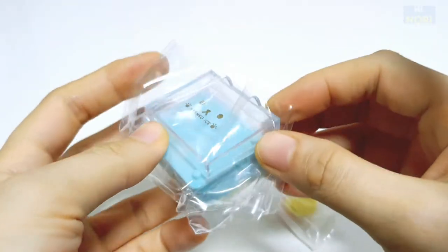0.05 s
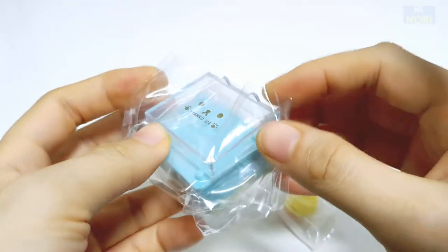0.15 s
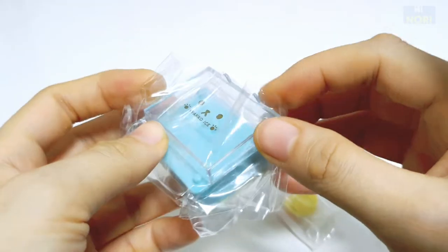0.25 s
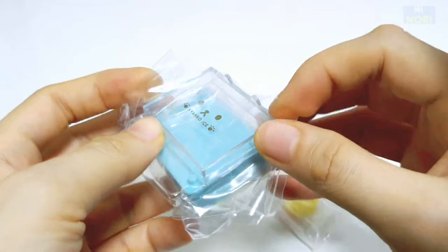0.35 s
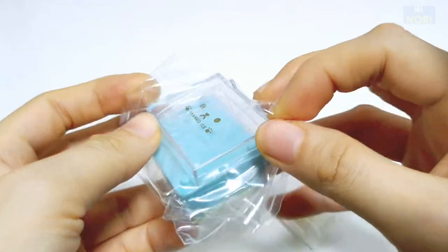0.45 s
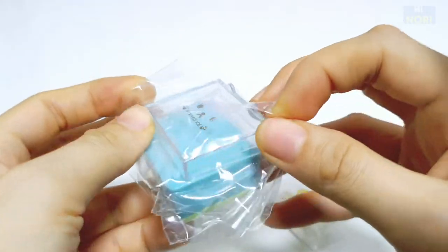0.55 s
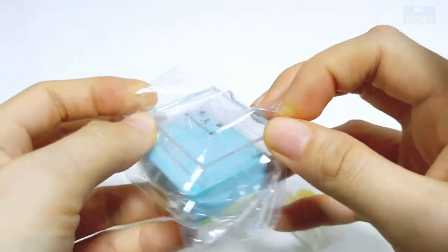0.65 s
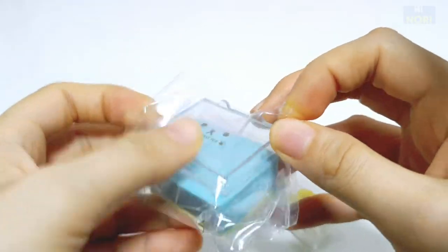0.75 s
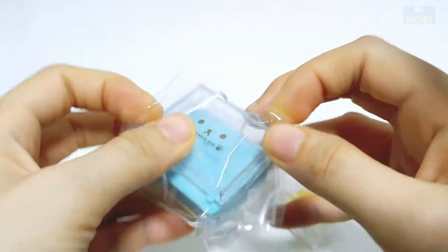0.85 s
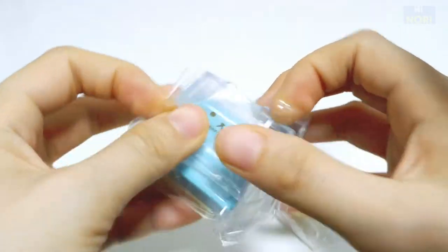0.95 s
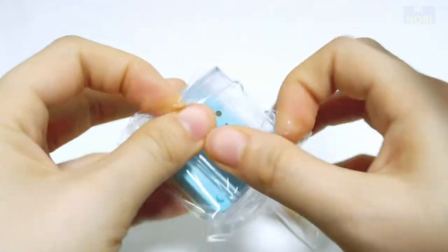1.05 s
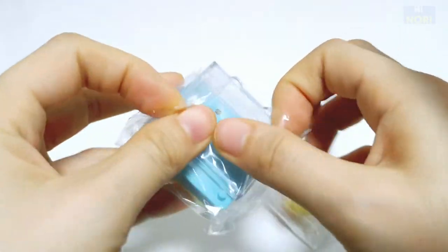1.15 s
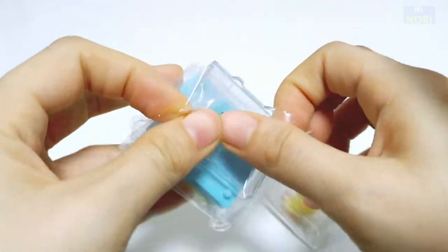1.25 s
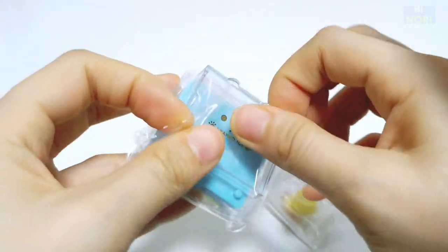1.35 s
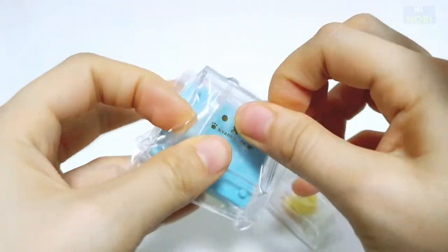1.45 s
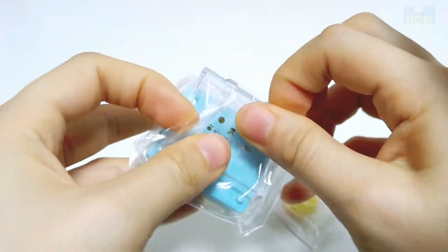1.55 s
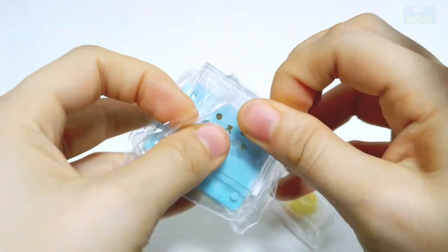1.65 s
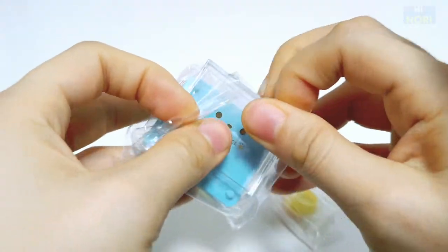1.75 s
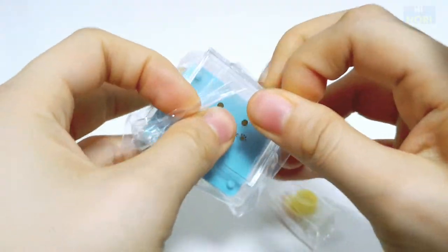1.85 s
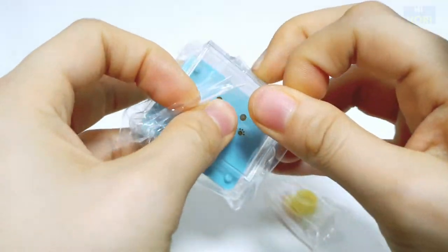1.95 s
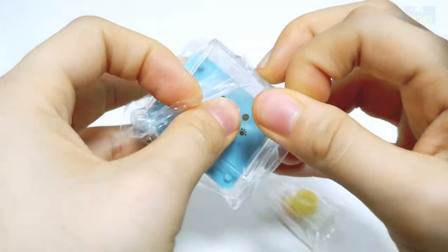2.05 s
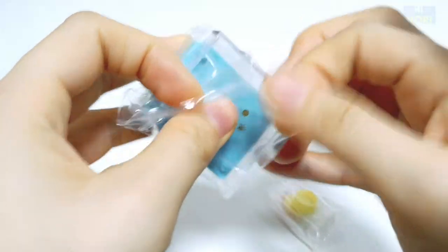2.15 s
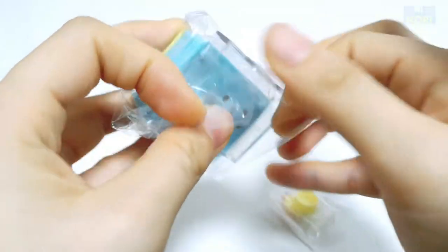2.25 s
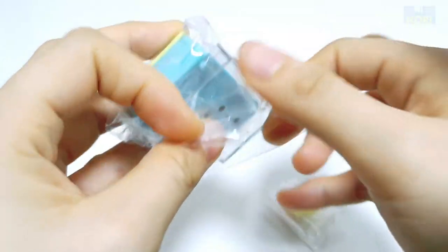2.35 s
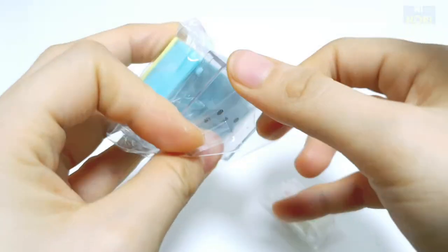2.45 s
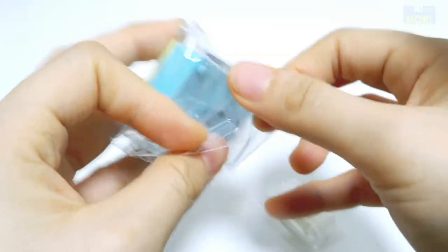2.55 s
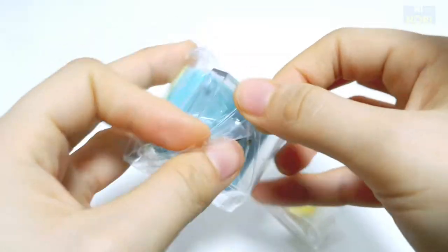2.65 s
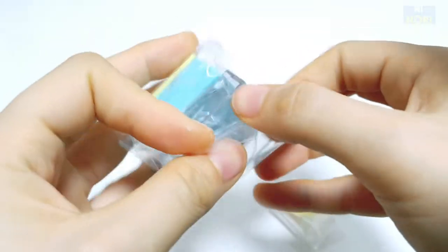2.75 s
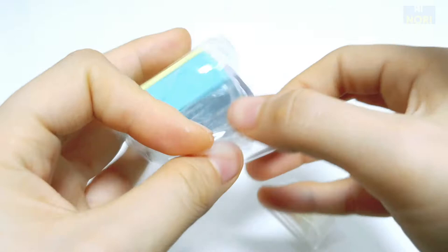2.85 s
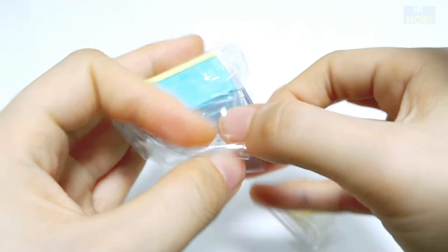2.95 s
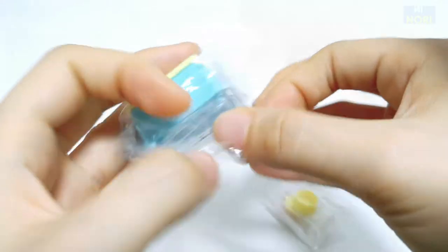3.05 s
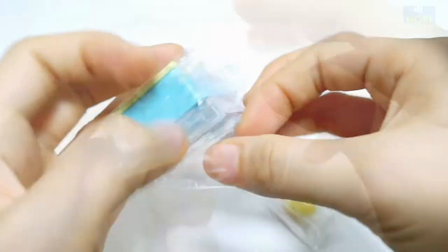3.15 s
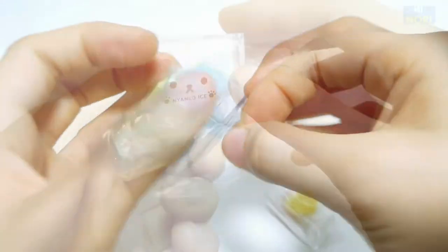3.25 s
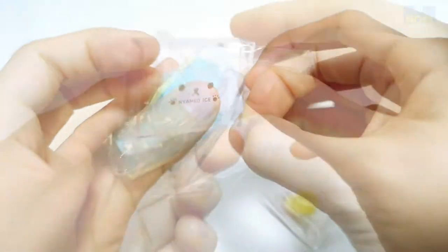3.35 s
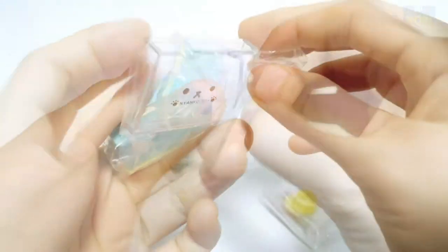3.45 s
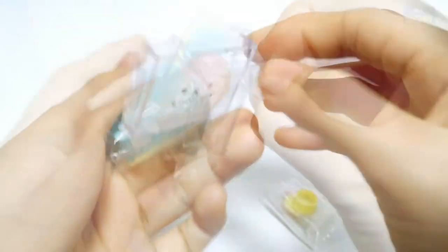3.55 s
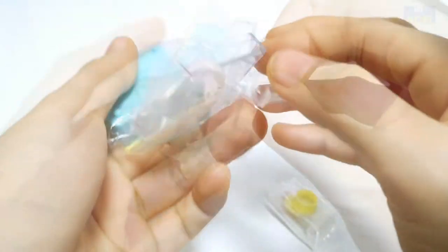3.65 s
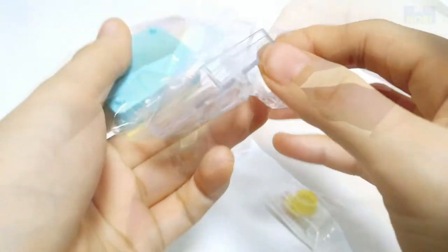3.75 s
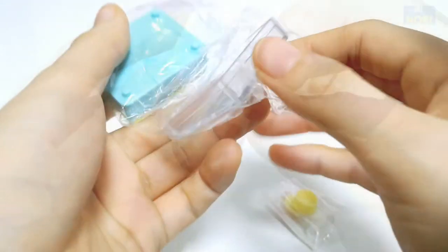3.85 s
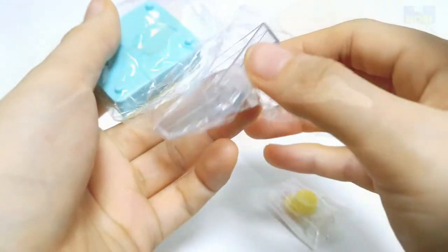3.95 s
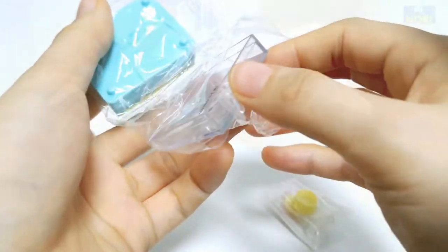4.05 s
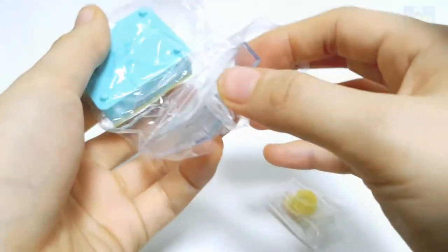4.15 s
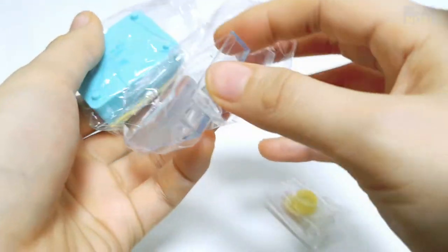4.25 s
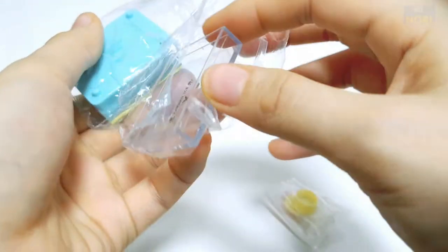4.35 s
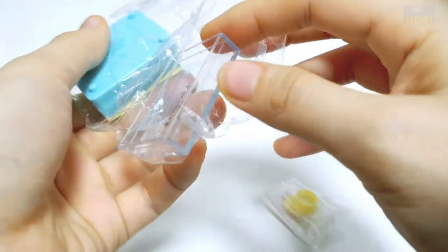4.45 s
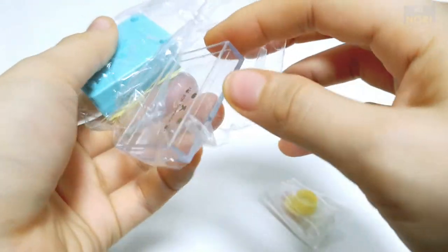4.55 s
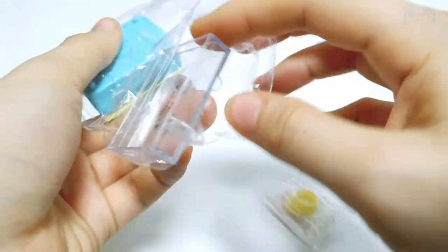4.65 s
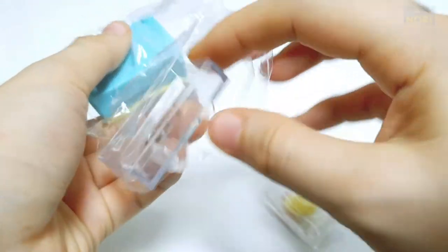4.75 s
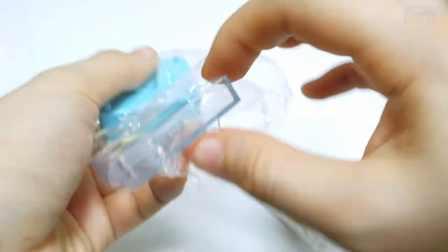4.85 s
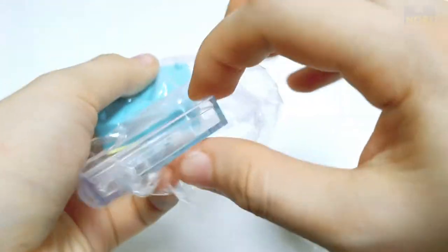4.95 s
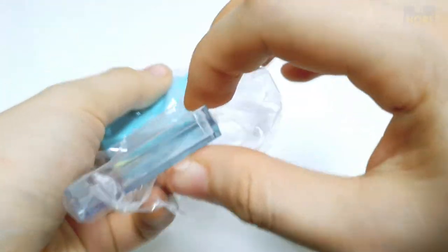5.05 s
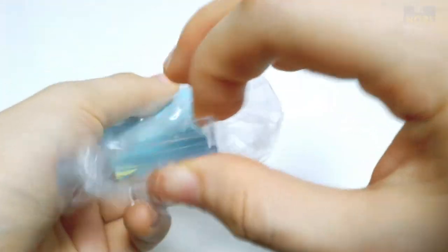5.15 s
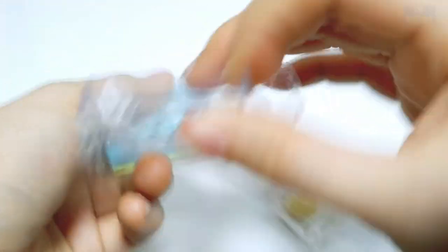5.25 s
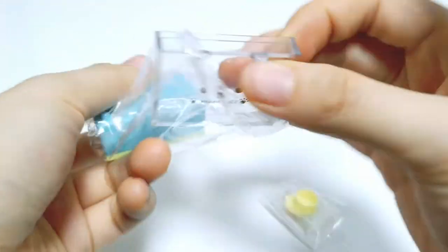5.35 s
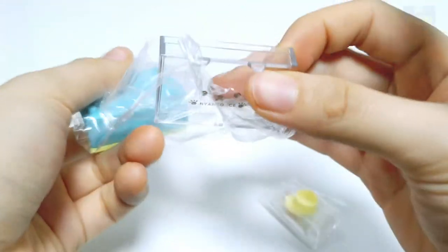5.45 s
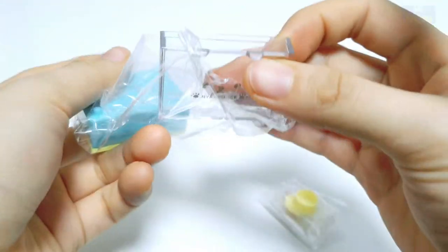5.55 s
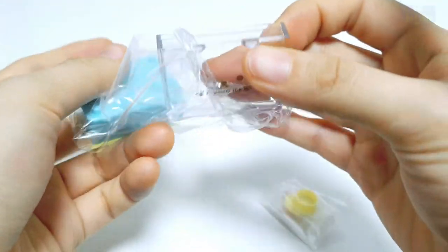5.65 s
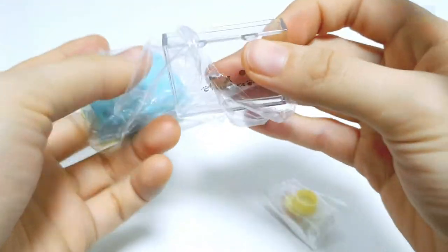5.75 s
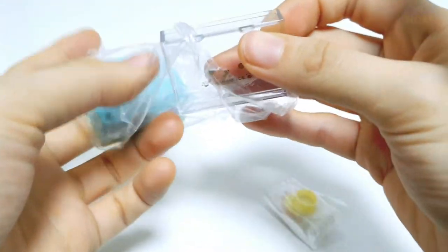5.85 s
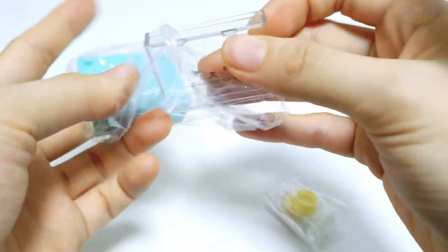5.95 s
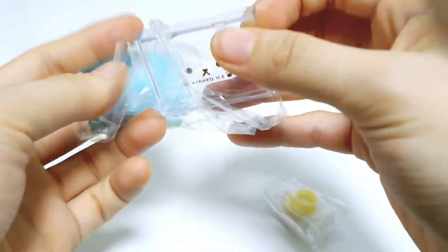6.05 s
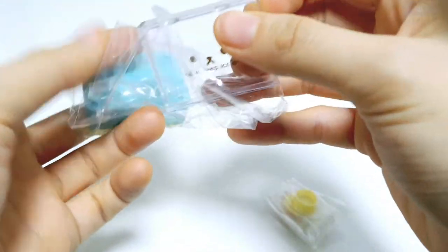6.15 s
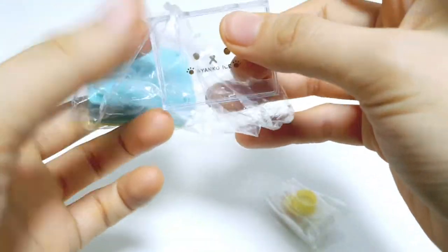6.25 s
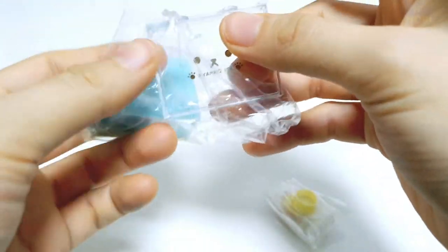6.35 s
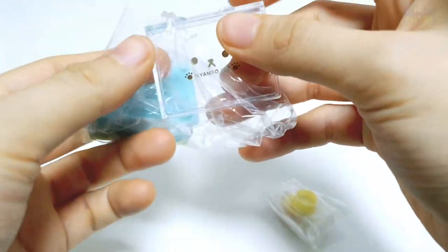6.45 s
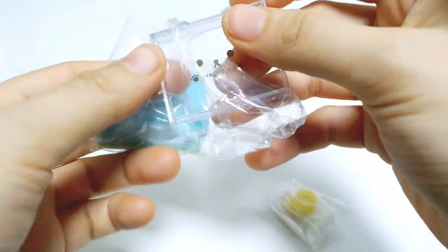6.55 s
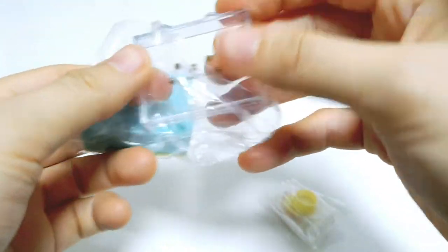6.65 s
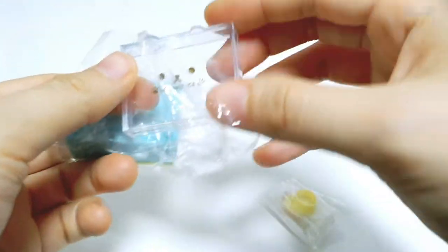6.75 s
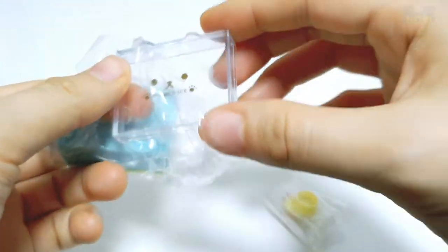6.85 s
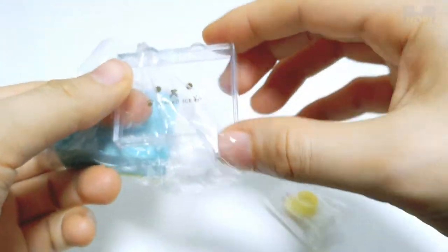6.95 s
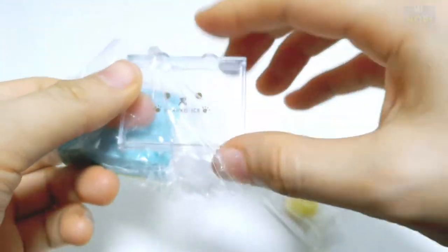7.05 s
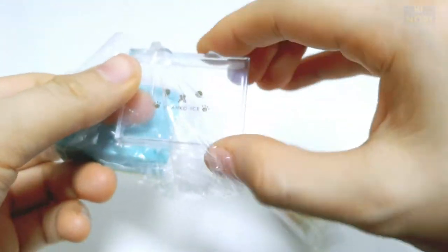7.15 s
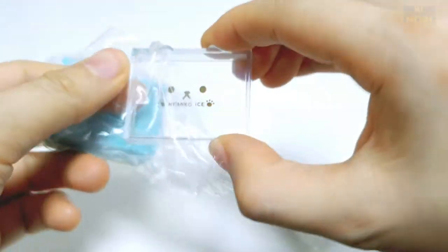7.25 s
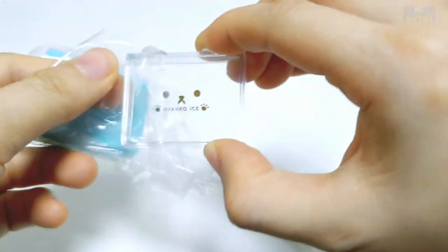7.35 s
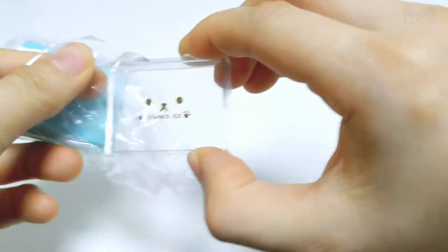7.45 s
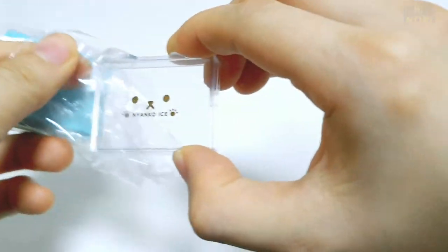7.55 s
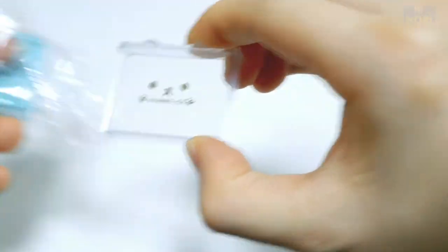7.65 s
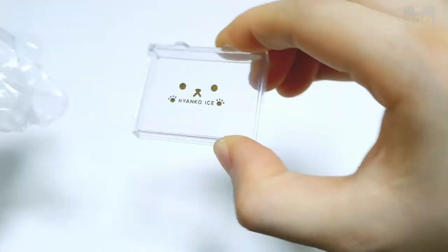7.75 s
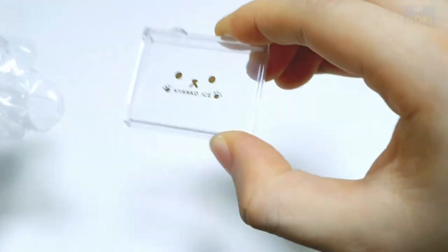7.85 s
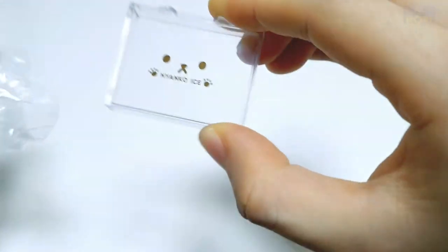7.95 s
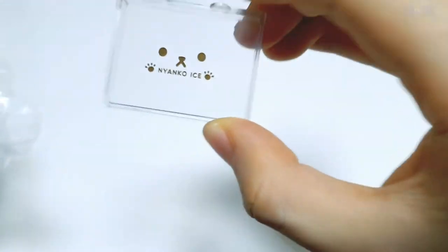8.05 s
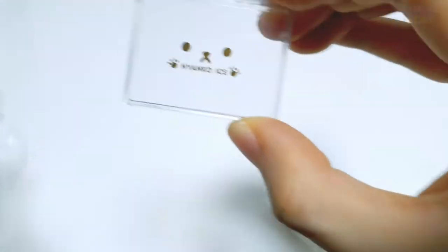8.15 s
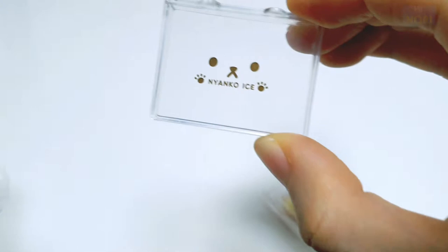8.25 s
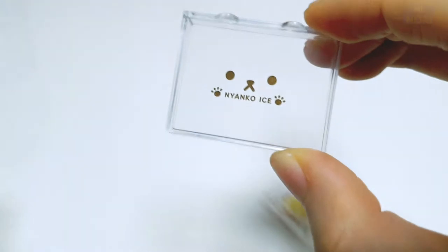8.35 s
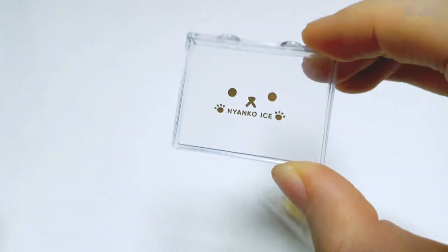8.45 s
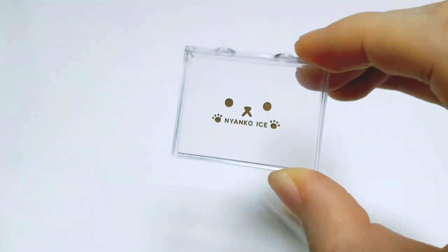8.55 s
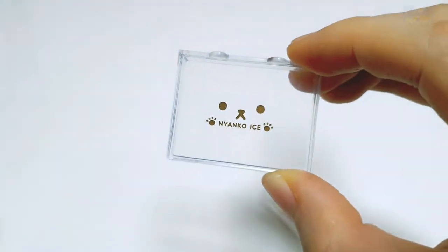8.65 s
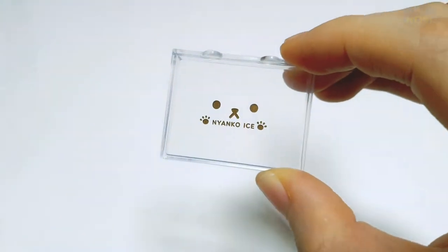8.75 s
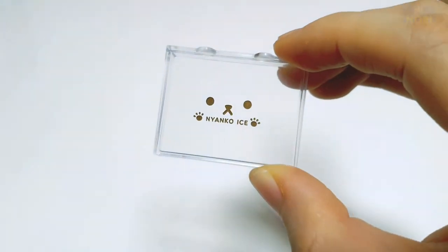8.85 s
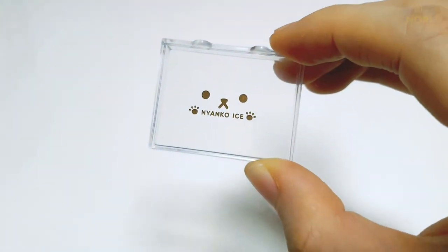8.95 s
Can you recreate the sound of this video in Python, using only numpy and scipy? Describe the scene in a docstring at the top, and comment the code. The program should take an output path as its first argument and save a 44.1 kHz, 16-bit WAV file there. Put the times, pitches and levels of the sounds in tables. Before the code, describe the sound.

Close up, thin plastic film crinkles and snaps sharply as hands unwrap a small hard plastic case, with hollow knocks and a brief low air rumble.

```python
"""Close to a pair of microphones, above a table in a small room with a faint hum, two hands unwrap a hard plastic case.
From the start they squeeze and let go of its thin film several times a second: it buckles in sharp snaps made of
filtered pulses, creases crackle as sparse noise grains, and fingers knock the case. Strokes of wrapper drag over it.
Just after 5 s a puff of air, low rolling noise, rumbles on the microphone while the work goes on. At 8 s the film is
laid aside; two fingertip ticks on the bare case follow, and the room answers throughout."""
import sys
import numpy as np
from scipy import signal
from scipy.fft import rfft, irfft, next_fast_len
from scipy.io import wavfile
from scipy.ndimage import uniform_filter1d

SR = 44100
rng = np.random.default_rng(int(sys.argv[2]) if len(sys.argv) > 2 else 0)


def generate_wav(signal):
    """Clip the signal to [-1, 1] and save it as 16-bit WAV at the path in sys.argv[1]."""
    frames = np.transpose(np.atleast_2d(signal))
    scaled = np.clip(frames, -1, 1) * 32767
    pcm = np.round(scaled).astype(np.int16)
    wavfile.write(sys.argv[1], SR, pcm)


N = 397341
TIME = np.arange(N) / SR

# "Before trim" levels are offset by the *_db settings of the function that plays them.
# still air of the room: (frequency [Hz], relative level [dB per Hz])
ROOM_AIR_SPECTRUM = [(25, -20), (60, -15), (100, -5), (150, -21.5), (230, -9), (350, -20), (600, -22.5),
                     (1000, -33), (3000, -39), (16000, -41)]
# hum in the room: (frequency [Hz], level [dB rms])
HUM_TONES = [(61.5, -77.5), (98, -78.5)]
# colour of the room's answer: (frequency [Hz], relative band level [dB])
WALL_SPECTRUM = [(100, 3), (250, 2), (700, -4), (1500, 2), (3000, 0), (4500, 4), (8000, -0.5), (12000, -2),
                 (16000, 8.5)]
# decay of the room by 60 dB: (frequency [Hz], time [s])
ROOM_DECAY = [(200, 0.45), (1000, 0.16), (5000, 0.18), (15000, 0.18)]
# air on the microphone: (time [s], level before trim [dB])
PUFF_LEVEL = [(5.16, -65.5), (5.2, -44), (5.245, -41.5), (5.262, -25.5), (5.30, -28), (5.385, -38.5),
              (5.42, -51), (5.48, -48), (5.6, -69)]
# buffeting air: (frequency [Hz], relative level [dB per Hz])
PUFF_SPECTRUM = [(20, -18), (35, -1), (50, 7.5), (72, -4), (100, -8.5), (122, -3.5), (180, -18.5),
                 (400, -52)]
# fingertips shifting on the bare case: (time [s], level before trim [dB])
FINGERTIP_TAPS = [(8.348, -49), (8.966, -61.5)]
# fingers bump the case; levels are energies before trim:
# (time [s], pitch of the push [Hz], soft push [dB], hard knock [dB])
BUMPS = [(0.121, 300, -50, -16.5), (0.536, 312, -22.5, -12), (1.41, 257, -25, -52),
         (1.555, 306, -24, -11.5), (1.704, 313, -19, -17), (2.267, 260, -23, -19.5), (2.382, 319, -27, -14),
         (2.509, 387, -14, -19.5), (2.961, 229, -15.5, -28), (3.014, 400, -20, -11.5),
         (3.116, 236, -15.5, -19.5), (3.788, 244, -22, -20), (4.137, 246, -19, -34),
         (4.347, 287, -18.5, -23), (4.442, 297, -14.5, -19), (4.672, 260, -9.5, -5),
         (4.748, 361, -10.5, -14), (4.786, 320, -16, -11.5), (4.827, 232, -5.5, -13), (4.851, 300, -20, -8),
         (5.014, 208, -11, -22), (5.169, 258, -14, -40), (5.198, 231, -6.5, -26), (5.255, 225, 2.5, -23),
         (5.274, 241, 0, -21), (5.317, 248, -2.5, -12), (5.343, 237, -14, -8.5), (5.449, 274, -6.5, -26),
         (5.705, 276, -5.5, -7.5), (5.77, 276, -15.5, -18), (5.882, 248, -12, -35), (5.926, 228, -19, -32),
         (5.955, 236, -33, -12), (6.046, 277, -12, -14.5), (6.231, 280, -26, -15.5),
         (6.333, 300, -22, -14.5), (6.595, 380, -11, -20), (6.787, 398, -25, -16), (6.97, 414, -18, -21),
         (7.013, 393, -15.5, -9.5), (7.28, 304, -13, -16.5), (7.49, 400, -27.5, -15.5),
         (7.804, 300, -24, -19.5), (7.636, 235, -1, -5.5), (7.672, 296, -16, -12), (7.701, 277, -7.5, -9)]
# film and skin sliding over the case: (start [s], end [s], rub before trim [dB], film hiss before trim [dB])
STROKES = [(1.699, 1.778, -50, -50), (2.215, 2.306, -53, -47), (2.562, 2.62, -61, -40),
           (4.645, 4.685, -41, -45), (4.74, 4.8, -48, -48.5), (4.806, 4.846, -55.5, -43.5),
           (5.144, 5.265, -50.5, -54.5), (5.283, 5.361, -40, -41), (5.431, 5.476, -39.5, -41.5),
           (5.64, 5.701, -43.5, -45), (5.959, 5.988, -42.5, -44), (7.614, 7.705, -37.5, -40)]
# skin rubbing: (frequency [Hz], relative level [dB per Hz])
SKIN_SPECTRUM = [(60, -13.5), (130, -13.5), (240, 0.5), (420, 0.5), (720, 3.5), (1200, -11), (2200, 4.5),
                 (3500, -22), (7000, -19)]
# film sliding: (frequency [Hz], relative level [dB per Hz])
FILM_SPECTRUM = [(1200, -5.5), (2200, 3.5), (3000, -0.5), (4400, 11.5), (7000, -3), (9000, -2.5),
                 (11500, 6.5), (15500, -17)]
# where the hands hold the case: (time [s], left over right [dB], lag of the right microphone [s])
HAND_POSITION = [(0, 4, 0.00011), (2.5, 3.5, 0.00014), (4.2, 4.5, 0.00019), (6.5, 4, 0.00019),
                 (7.301, 7, .00025), (8, 6, 0.00029)]
# fingers squeezing the film: (start [s], length [s], force as crackle level before sag [dB])
FINGER_SQUEEZES = [(0.049, 0.14, -51.5), (0.294, 0.046, -59), (0.397, 0.038, -51.5), (0.512, 0.017, -48.5),
                   (0.63, 0.08, -58.5), (0.678, 0.17, -51), (0.864, .22, -52), (1.15, 0.12, -55.5),
                   (1.366, 0.037, -49), (1.509, .15, -46.5), (1.693, 0.21, -55.5), (2.06, .24, -52.5),
                   (2.356, 0.12, -54), (2.505, 0.12, -46), (2.699, 0.21, -52), (2.876, .16, -51),
                   (3.08, 0.5, -62.5), (3.423, 0.17, -52), (3.705, .12, -53.5), (3.973, 0.21, -49),
                   (4.232, 0.13, -50.5), (4.422, 0.029, -49.5), (4.537, 0.094, -46.5), (4.647, .26, -43.5),
                   (4.965, 0.094, -54.5), (5.169, 0.18, -44), (5.421, 0.096, -44.5), (5.592, .18, -45),
                   (5.862, 0.094, -46.5), (6.099, 0.17, -52.5), (6.203, 0.15, -49), (6.49, 0.093, -53.5),
                   (6.6, 0.26, -48), (6.947, 0.2, -48.5), (7.19, .17, -47.5), (7.416, 0.047, -49.5),
                   (7.555, 0.14, -48.5), (7.77, 0.12, -57.5), (7.953, 0.017, -45.5)]
# how well the film, as it pulls tight, passes a buckle to the case:
# (time [s], knock of a 0 dB buckle before trim [dB])
FILM_TO_CASE = [(0, -28.5), (2, -21), (4.5, -18), (8, -22.5)]
# loudest buckles of the film; levels are energies before trim:
# (time [s], pitch of the flexing patch [Hz], its ring [dB], bright crack [dB])
LOUD_BUCKLES = [(.034, 5000, -26, -42), (.054, 6370, -21, -1), (.103, 6080, -19, -5),
                (.119, 4150, -4.5, -42), (.151, 3370, -13.5, -16.5), (.199, 11480, -10.5, -8),
                (.315, 5000, -15, -21), (.324, 2050, -13.5, -7.5), (.393, 10000, 2.5, -10.5),
                (.434, 3640, -22, -15.5), (.518, 3540, -21, -9), (.538, 4400, -5, -15),
                (.622, 2740, -15.5, -7.5), (.633, 1800, -18, -2), (.687, 1970, -21.5, -12),
                (.716, 4400, -5, -4), (.731, 6430, -5, -9), (.756, 2100, -7.5, -28),
                (.782, 1960, -11.5, -10), (.821, 2600, -12, -7), (.864, 1110, -15.5, -19),
                (.909, 1270, -16, -19), (.924, 1590, -17, -6.5), (.958, 5130, -9.5, -10),
                (.974, 3250, -21, -11), (1.15, 1486, -16.5, -8.5), (1.195, 4070, -2, -9),
                (1.257, 2590, -22.5, -36.5), (1.334, 1600, -12, -5.5), (1.353, 1880, -12, -1),
                (1.447, 5300, -32, -18.5), (1.467, 2870, -24, -17), (1.538, 1500, -11, -16.5),
                (1.555, 1920, -7, -13), (1.581, 3700, 0, -3), (1.603, 3980, 1, -18),
                (1.647, 3470, -5.5, -12.5), (1.695, 2040, -5.5, -8), (1.705, 2980, -6, -1),
                (1.749, 12300, 0, -3), (1.777, 2160, -10.5, -13.5), (1.796, 4330, -8, -4.5),
                (1.892, 4670, -23, -1), (1.905, 5440, -6.5, -22), (1.926, 2000, -26.5, -9.5),
                (1.954, 3740, -11, -36), (2.062, 2000, -26, -33), (2.075, 4530, -6, -7.5),
                (2.128, 1970, -12, -16), (2.18, 4200, -1.5, -12), (2.233, 2250, -15, -9),
                (2.245, 4800, -9, -19.5), (2.299, 5000, -11, -35), (2.357, 2270, -7.5, -8.5),
                (2.382, 7050, -2, -5.5), (2.417, 4100, -9.5, -13), (2.564, 3340, -13.5, -7),
                (2.619, 1257, -17, -10.5), (2.722, 4400, -5, -15), (2.796, 4100, -2, -7.5),
                (2.876, 1643, -16.5, -12), (2.901, 1240, -17, -6.5), (2.944, 1800, -15, -7),
                (2.992, 2050, -13, -4.5), (3.015, 1180, -1, -10.5), (3.082, 4160, -9.5, -30),
                (3.116, 1810, -19, -15), (3.214, 1860, -18, -26), (3.363, 4000, -31, -25.5),
                (3.44, 2420, -15, -11), (3.48, 1600, -8.5, -12), (3.493, 1800, -14, -7),
                (3.653, 1470, -14, -21), (3.695, 2230, -16, -19), (3.725, 3460, -16, -15),
                (3.79, 1940, -13.5, -12.5), (3.834, 4900, -17.5, -33), (3.881, 2090, -18.5, -21.5),
                (3.919, 1630, -24, -18), (3.955, 1990, -17, -25), (4.001, 1820, -17, -10),
                (4.151, 3100, -25, -19), (4.256, 2580, -19.5, -13.5), (4.424, 2575, -11.5, -11.5),
                (4.53, 2050, -14.5, -7), (4.611, 2050, -13, -6), (4.645, 1600, -8, -14.5),
                (4.668, 3110, -9.5, -4.5), (4.687, 2900, -14, -3), (4.75, 3480, -9.5, -9),
                (4.778, 1600, -0.5, -6), (4.834, 1070, 0, -3.5), (4.841, 11300, 1, -28),
                (4.851, 1220, 1.5, -1), (4.898, 2350, -7.5, -7.5), (4.967, 3100, -20.5, -21.5),
                (5.181, 3490, -8.5, -8.5), (5.203, 3350, -9, -1), (5.212, 2200, -8.5, 0),
                (5.249, 1168, -6.5, -7.5), (5.286, 3300, -4.5, -7.5), (5.304, 4200, -9.5, 1),
                (5.318, 2300, -2.5, -4.5), (5.342, 2840, -3.5, -10), (5.424, 1464, -6.5, -1),
                (5.447, 2900, -12, -12), (5.464, 3970, -12.5, -10.5), (5.5, 1314, -13, -12),
                (5.594, 2070, -4.5, -2), (5.665, 3820, -8, 0.5), (5.719, 2110, -13.5, -1.5),
                (5.763, 2130, -13.5, -9), (5.882, 3870, -7.5, -8), (5.888, 1980, -12, -10.5),
                (5.98, 3330, -13, -10), (6.046, 3900, -9, -13.5), (6.111, 2150, -13.5, -10.5),
                (6.165, 3480, -13, -21), (6.231, 4700, -13.5, -16), (6.266, 5300, -16, -13),
                (6.297, 3020, -7.5, -11.5), (6.311, 1020, -10, -30), (6.513, 4200, -19, -41),
                (6.598, 4060, -10.5, -27), (6.61, 2365, -10, -5), (6.673, 3420, -13, -37),
                (6.786, 4500, -9.5, -12), (6.814, 3450, -20, -13.5), (6.884, 1650, -11, -20),
                (6.96, 4680, -13.5, -18), (7.002, 3520, -4.5, -10.5), (7.014, 2480, -3, 1.5),
                (7.108, 1950, -16, -11), (7.121, 4060, 0.5, -3), (7.203, 11200, -11, -29),
                (7.243, 11330, 0.5, -12), (7.294, 1630, -11.5, -0.5), (7.336, 2880, -4.5, -3.5),
                (7.366, 1450, -31.5, -10.5), (7.458, 1900, -20, -12), (7.49, 2190, -11, -35),
                (7.564, 3700, -11, -6.5), (7.638, 11800, 3, -21), (7.672, 2400, -14, -6),
                (7.691, 2534, -16, -5), (7.77, 3870, -21, -31), (7.827, 1990, -32, -16.5),
                (7.885, 8100, -18, -11), (7.956, 7340, -16, -14), (7.983, 2540, -16.5, -15),
                (8.078, 1950, -37, -32)]

SQUEEZE_ATTACK_S, SAG_DB_PER_S, RELEASE_DB_PER_S = 0.0027, 7.5, 298
REST_DB, LET_GO_S = -73, 8.02   # the film merely held; then it is laid aside
KNOCK_DB_PER_BUCKLE_DB = 0.61


def from_db(db):
    """Decibels to gain."""
    return 10 ** (np.asarray(db) / 20)


def rms_one(x):
    """Scale to rms 1 over both channels together."""
    return x / np.sqrt(np.mean(x ** 2) + 1e-30)


def energy_one(x):
    """Scale each channel to energy 1."""
    return x / np.sqrt(np.sum(x ** 2, axis=-1, keepdims=True) + 1e-30)


def at_hz(points, hz):
    """Read a spectrum table on a log-frequency axis."""
    f, value = np.transpose(points)
    return np.interp(np.log(hz), np.log(f), value)


def passed(x, hz, kind, order=1):
    """Causal Butterworth filter."""
    sections = signal.butter(order, hz, kind, fs=SR, output="sos")
    return signal.sosfilt(sections, x)


def panned(left_over_right_db):
    """Left and right gains of mean power 1."""
    return rms_one(from_db([[left_over_right_db / 2], [-left_over_right_db / 2]]))


def add(out, s, sound):
    """Mix a short stereo sound in at a time."""
    at = max(round(s * SR), 0)
    out[:, at:at + sound.shape[1]] += sound[:, :max(N - at, 0)]


def pair(size, alike):
    """Two channels of white noise with a given correlation."""
    mid, side = rng.standard_normal((2, size))
    return np.sqrt((1 + alike) / 2) * mid + np.sqrt((1 - alike) / 2) * side * [[1], [-1]]


def coloured(x, spectrum):
    """Shape a sound by a smooth spectrum; rms 1."""
    size = next_fast_len(N)
    hz = np.maximum(np.fft.rfftfreq(size, 1 / SR), 1)
    shaped = rfft(x, size) * from_db(at_hz(spectrum, hz))
    return rms_one(irfft(shaped, size)[:, :N])


def jolt(t, release_s, shiver_s, shiver_db, alike):
    """Stress lets go in one clean pulse, with a noisy shiver of the sheet around it."""
    release = energy_one(t * np.exp(-t / release_s)) * rng.choice([-1, 1])
    shiver = energy_one(pair(len(t), alike) * np.sqrt(t) * np.exp(-t / shiver_s))
    return release + from_db(shiver_db) * shiver


def grains(per_s, grain_s, smooth_db, alike):
    """Tiny slips of uneven size, each a decaying burst of noise, over a smooth sliding hiss."""
    sizes = from_db(4 * np.minimum(rng.exponential(1, N), 3))
    born = rng.random(N) < per_s / SR
    decay = np.exp(-2 / (grain_s * SR))
    power = signal.lfilter([1], [1, -decay], (born * sizes) ** 2 + 1e-18)
    return pair(N, alike) * np.sqrt(power / power.mean() + from_db(smooth_db) ** 2)


def background(air_db=-73):
    """Still room air is shaped noise; the low hum is steady sines."""
    hum = 0
    for hz, db in HUM_TONES:
        hum = hum + from_db(db) * np.sqrt(2) * np.sin(2 * np.pi * (hz * TIME + rng.random()))
    return hum + from_db(air_db) * coloured(pair(N, 0.29), ROOM_AIR_SPECTRUM)


def room(x, near_db=-14, tail_db=-10.0, near_s=0.00097, build_s=0.0013):
    """Quick echoes off the hands and table, then a diffuse tail that dies band by band."""
    t = np.arange(SR // 2) / SR
    near = passed(pair(len(t), 0.25), 500, "high")
    near = energy_one(near * np.exp(-t / near_s) * (t > .002))
    edges, tail = np.geomspace(90, 18000, 12), 0
    for low, high in zip(edges, edges[1:]):
        hz = np.sqrt(low * high)
        # low bands reach both microphones more alike
        alike = 1 / (1 + (hz / 900) ** 2)
        band = passed(pair(len(t), alike), [low, high], "band", order=2)
        tail = tail + band * from_db(at_hz(WALL_SPECTRUM, hz) - 60 * t / at_hz(ROOM_DECAY, hz))
    tail = energy_one(tail * (1 - np.exp(-t / build_s)) * (t > .003))
    response = from_db(near_db) * near + from_db(tail_db) * tail
    return signal.fftconvolve(x, response, axes=1)[:, :N]


def puff(level_db=-1.0):
    """Moving air buffets the microphone in one continuous low roll, mostly on the right."""
    level = np.interp(TIME, *np.transpose(PUFF_LEVEL), left=-120, right=-120)
    eddies = coloured(pair(N, .15), PUFF_SPECTRUM)
    # evening out the noise's own swells leaves the shape to the level curve
    swell = np.sqrt(uniform_filter1d(eddies ** 2, size=1300) + 1e-6)
    return from_db(level + level_db) * rms_one(eddies / swell) * panned(-14.5)


def taps(level_db=12, tap_hz=(900, 3200)):
    """A fingertip on the held case gives a faint, damped tick."""
    out, t = np.zeros((2, N)), np.arange(900) / SR
    for s, db in FINGERTIP_TAPS:
        touch = jolt(t, release_s=.00003, shiver_s=0.0044, shiver_db=-9.0, alike=0.66)
        tick = passed(touch, tap_hz, "band", order=2)
        add(out, s, from_db(db + level_db) * energy_one(tick))
    return out


def thumps(level_db=-4.5, thump_s=0.0054, width=1.37, shiver_db=13, weight_db=-10):
    """Soft flesh gives the case a short, hollow push, with the weight of the hand below it."""
    out, t = np.zeros((2, N)), np.arange(3000) / SR
    for s, hz, db, _ in BUMPS:
        push = jolt(t, release_s=0.00022, shiver_s=thump_s, shiver_db=shiver_db, alike=0.52)
        hollow = energy_one(passed(push, [hz / width, hz * width], "band", order=2))
        low = passed(push, [85, 160], "band", order=2)
        weight = energy_one(passed(low, 70, "high", order=2))
        add(out, s, from_db(db + level_db) * (hollow + from_db(weight_db) * weight))
    return out * panned(0.7)


def knocks(level_db=1.1, knock_hz=(600, 1200)):
    """The hard case answers each bump with a short knock."""
    out, t = np.zeros((2, N)), np.arange(700) / SR
    for s, _, _, db in BUMPS:
        hit = jolt(t, release_s=.000015, shiver_s=0.0007, shiver_db=2.5, alike=0.79)
        body = passed(hit, knock_hz, "band", order=2)
        add(out, s, from_db(db + level_db) * energy_one(body))
    return out


def slides(edge_s=0.0012, rub_trim_db=0.5, hiss_trim_db=2.5):
    """The wrapper drags over the case in a dense run of sticks and slips."""
    rub, hiss = np.zeros((2, N))
    for start, end, rub_db, hiss_db in STROKES:
        stroke = np.clip(np.minimum(TIME - start, end - TIME) / edge_s + .5, 0, 1)
        rub += stroke * from_db(rub_db + rub_trim_db)
        hiss += stroke * from_db(hiss_db + hiss_trim_db)
    rubbing = rub * coloured(grains(500, 0.0028, -6.5, 0.71), SKIN_SPECTRUM)
    hissing = hiss * coloured(grains(430, 0.00028, -2, 0.091), FILM_SPECTRUM)
    return rubbing + hissing


def force_db():
    """Each squeeze sets in quickly, sags while it is held and dies away once the fingers relax."""
    held = REST_DB - RELEASE_DB_PER_S * np.maximum(TIME - LET_GO_S, 0)
    for start, length, db in FINGER_SQUEEZES:
        span = slice(max(int(start * SR), 0), int((start + length) * SR) + SR // 4)
        t = np.maximum(TIME[span] - start, 1 / SR)
        attack = 20 * np.log10(np.minimum(t / SQUEEZE_ATTACK_S, 1))
        release = RELEASE_DB_PER_S * np.maximum(t - length, 0)
        squeeze = db + attack - SAG_DB_PER_S * t - release
        held[span] = np.maximum(held[span], squeeze)
    return held


def crackle(force, tilt_db_per_octave=0.5, per_s=22, skin_db=-4.5, width=1.39):
    """Small creases tick in bands of different pitch while the film is worked, and skin rustles softly on it."""
    ticks = 0
    for hz in np.geomspace(900, 12000, 9):
        creases = passed(grains(per_s, .0007, -16, 1.0), [hz / width, hz * width], "band", order=2)
        ticks = ticks + rms_one(creases) * from_db(tilt_db_per_octave * np.log2(hz / 3000))
    skin = coloured(grains(120, 0.0026, -20.5, 0.77), SKIN_SPECTRUM)
    return from_db(force) * (rms_one(ticks) + from_db(skin_db) * skin)


def flex(x, hz, width=1.36):
    """A patch of film is a broad resonance that radiates little bass."""
    resonance = passed(x, [hz / width, hz * width], "band")
    return passed(resonance, hz / 3, "high")


def buckle(hz, ring_db, crack_db, knock_db, crack_hz=(6000, 15000), knock_hz=(580, 1300), beam_db=-1.0, sing_db=-8):
    """A patch of film rings, sheds a bright crack and knocks the case."""
    t = np.arange(700) / SR
    bend = jolt(t, release_s=.000012, shiver_s=0.00055, shiver_db=-0.5, alike=0.5)
    patch = energy_one(flex(bend, hz))
    # one mode of the patch outlasts the rest by a few cycles and gives each snap its own tone
    mode_hz = hz * rng.uniform(.85, 1.15)
    phase = 2 * np.pi * (mode_hz * t + rng.random((2, 1)))
    mode = energy_one(np.sin(phase) * np.sqrt(t) * np.exp(-t * mode_hz / 2.7))
    patch = energy_one(patch + from_db(sing_db) * mode)
    # a taut film (strong crack) lets go all at once, a slack one raggedly
    ragged_s = np.interp(crack_db, [-20, 0], [.00055, .00018])
    edge = jolt(t, release_s=.000008, shiver_s=ragged_s, shiver_db=13, alike=0.055)
    edge = passed(passed(edge, crack_hz, "band"), 2700, "high")
    hit = jolt(t, release_s=.000015, shiver_s=0.00058, shiver_db=5.0, alike=.7)
    body = energy_one(passed(hit, knock_hz, "band", order=2))
    # the crack alone leans slightly to the right, before the hands' position is applied
    crack = from_db(crack_db) * energy_one(edge) * panned(beam_db)
    return from_db(ring_db) * patch + crack + from_db(knock_db) * body


def small_buckles(force, count=170, above_db=30, spread_db=3.0, pitch_hz=2800, spread_octaves=.8,
                  crack_db=-4, crack_spread_db=5.5):
    """Lesser patches give way at uneven moments, harder under a harder squeeze; rows like LOUD_BUCKLES."""
    times = (np.arange(count) + rng.random(count)) * LET_GO_S / count
    size, pitch, edge = np.clip(rng.standard_normal((count, 3)), -1.6, 1.6).T
    hz = pitch_hz * 2 ** (spread_octaves * pitch)
    ring = np.interp(times, TIME, force) + above_db + spread_db * size
    crack = ring + crack_db + crack_spread_db * edge
    return np.transpose([times, hz, ring, crack])


def snaps(rows, ring_trim_db=-1.14, crack_trim_db=-0.5, knock_trim_db=0.6, pan_spread_db=4.5,
          slip_db=-16, slip_s=0.0055, creep_db=-21, creep_s=.014):
    """Each buckle knocks the case, harder if stronger; its crease creeps earlier and slips just before or after."""
    out = np.zeros((2, N))
    for s, hz, ring, crack in rows:
        coupling = np.interp(s, *np.transpose(FILM_TO_CASE))
        knock = KNOCK_DB_PER_BUCKLE_DB * max(ring, crack) + coupling
        snap = buckle(hz, ring + ring_trim_db, crack + crack_trim_db, knock + knock_trim_db)
        add(out, s, snap * panned(rng.normal(0, pan_spread_db)))
        # slip and creep are fainter copies of the snap
        delay = slip_s * rng.uniform(0.19, 1) * rng.choice([-1, 1])
        add(out, s + delay, snap * from_db(slip_db))
        lead = creep_s * rng.uniform(0.43, 1)
        add(out, s - lead, snap * from_db(creep_db + rng.normal(0, 2.6)))
    return out


def placed(x):
    """The hands are nearer the left microphone: it hears them louder and sooner."""
    s, *columns = np.transpose(HAND_POSITION)
    pan_db, lag = (np.interp(TIME, s, c) for c in columns)
    gains = from_db([pan_db / 2, -pan_db / 2])
    gains = gains / np.sqrt(np.mean(gains ** 2, axis=0))
    late_right = np.interp(TIME - lag, TIME, x[1])
    return np.array([x[0], late_right]) * gains


def scene(bump_room_db=-2):
    """The plastic close by, the room around it."""
    force = force_db()
    buckles = snaps(LOUD_BUCKLES) + snaps(small_buckles(force), knock_trim_db=-1.0)
    film = buckles + crackle(force) + slides()
    plastic = film + knocks() + taps()
    bumps = thumps()
    answer = room(plastic + from_db(bump_room_db) * bumps)
    return background() + answer + puff() + bumps + placed(plastic)


def record(dry):
    """The treble is cut steeply above 15.85 kHz."""
    return signal.sosfilt(signal.ellip(10, .1, 70, 15850, fs=SR, output="sos"), dry)


dry = scene()
out = record(dry)
generate_wav(out)
```